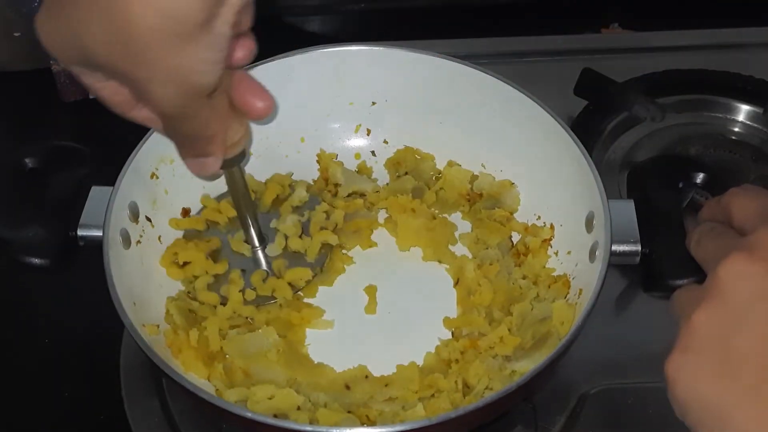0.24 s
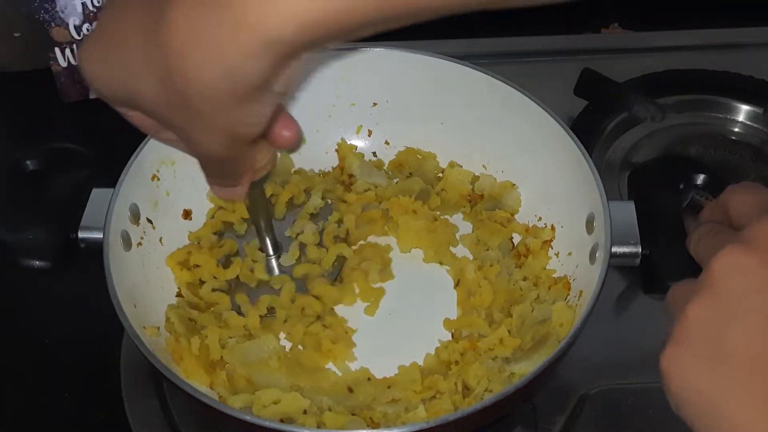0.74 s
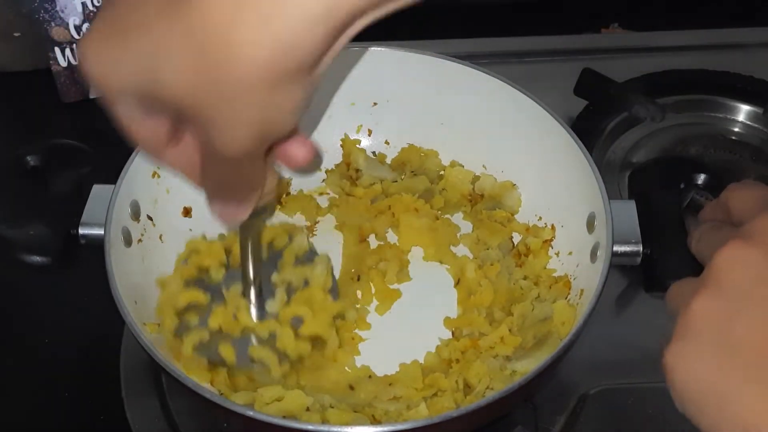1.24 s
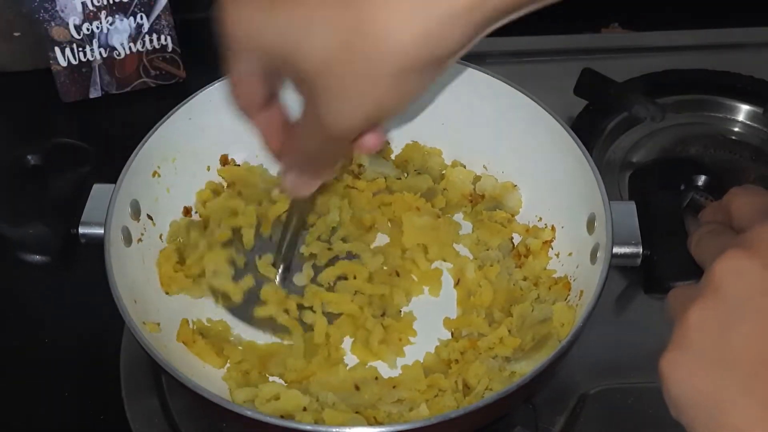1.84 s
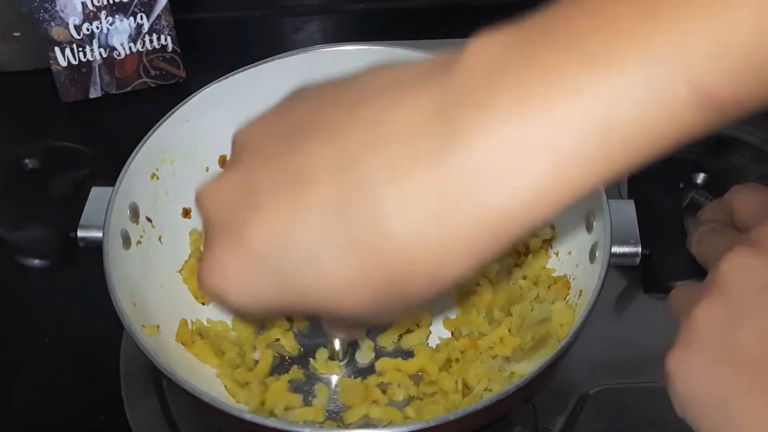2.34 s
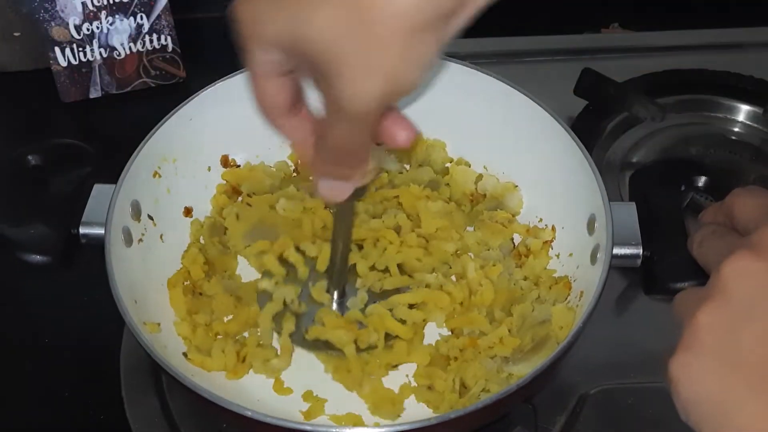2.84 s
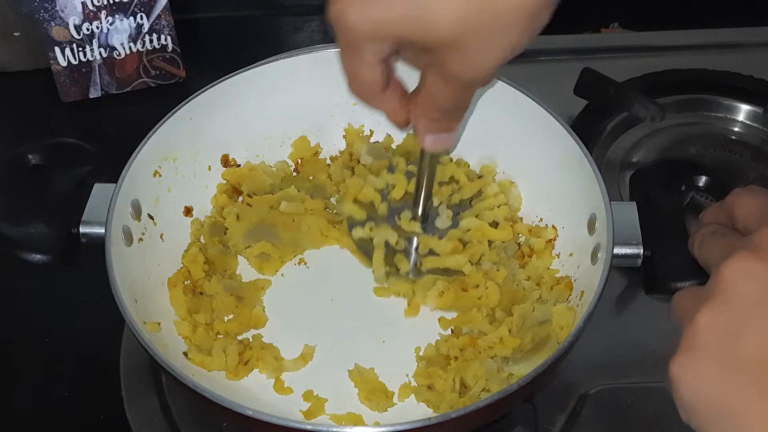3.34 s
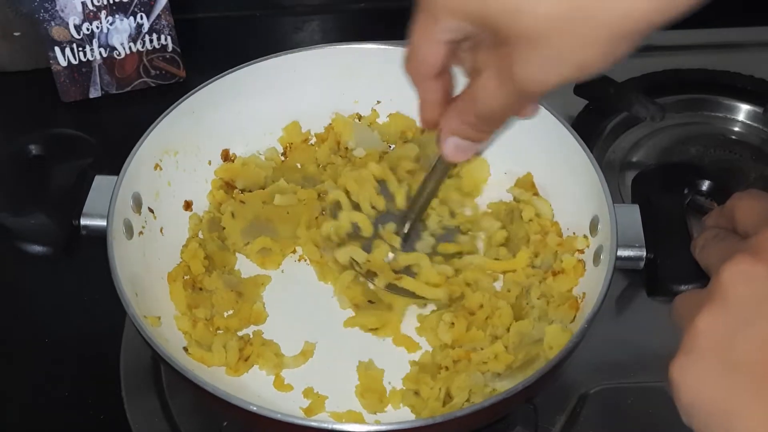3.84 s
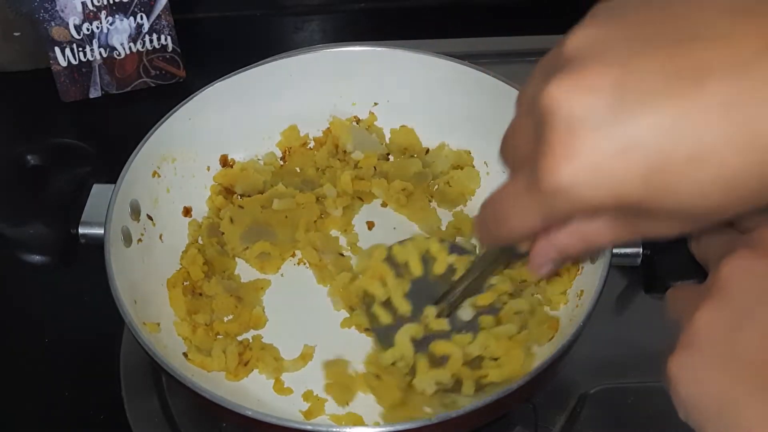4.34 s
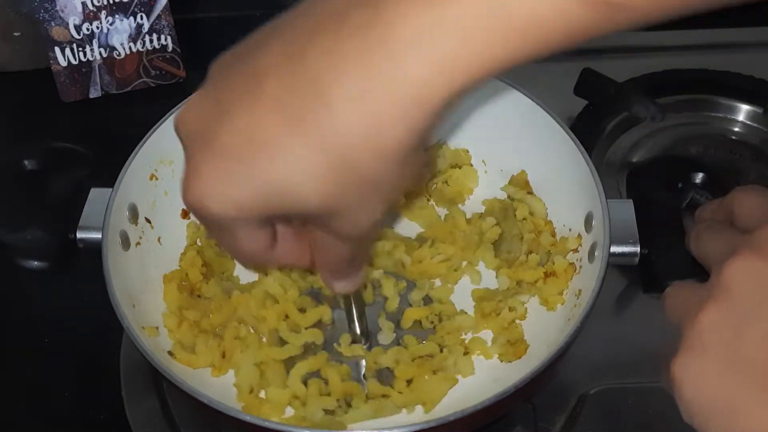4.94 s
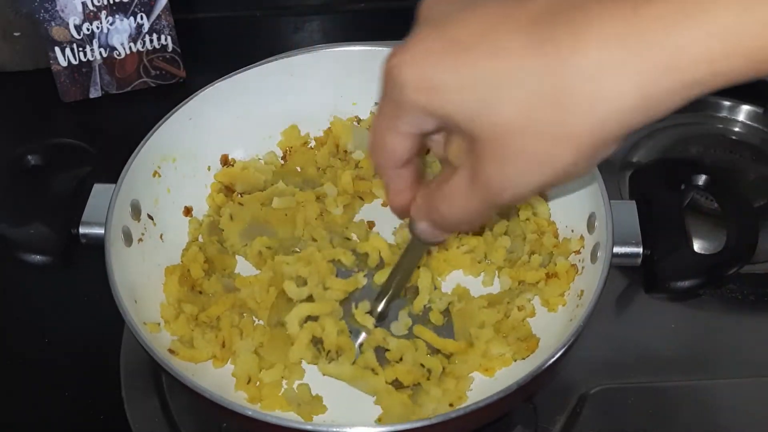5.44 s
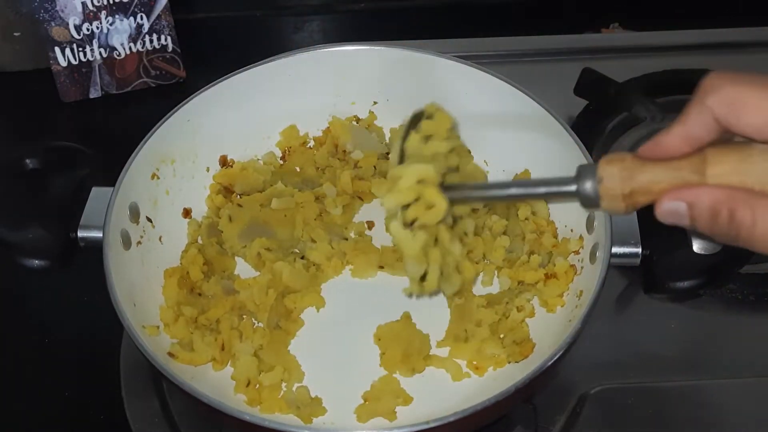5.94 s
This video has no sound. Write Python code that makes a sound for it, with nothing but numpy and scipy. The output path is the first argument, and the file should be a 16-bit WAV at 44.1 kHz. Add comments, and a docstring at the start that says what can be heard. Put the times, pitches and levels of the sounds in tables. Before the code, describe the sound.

A steel masher squelches through boiled potato in a pan, clinking on the bottom with hollow pan knocks, over a low beating fan hum.

```python
"""Soft squelches, wet pops, clinks and knocks: a steel masher presses boiled potatoes in a pan on a stove, close by.
Coloured noise and random grains make the squelch and push; when the plate gets through, struck modes and dense
noise make it clink on the bottom and the pan knock on its support. Dull thuds and thin squeaks come in between.
Behind are a faint frying hiss of filtered noise and two sine motors that beat over a rush of air;
decaying noise tails let the small room ring briefly."""
import sys
import numpy as np
from scipy import signal
from scipy.fft import rfft, irfft, next_fast_len
from scipy.io import wavfile

SR = 44100
rng = np.random.default_rng(int(sys.argv[2]) if len(sys.argv) > 2 else 0)


def to_wav(sig):
    """Store sig (one row per channel, or 1-D mono) as 16-bit WAV at the path in sys.argv[1].

    Samples outside -1..1 are clipped; the rate is SR.
    """
    pcm = np.clip(np.atleast_2d(sig), -1, 1) * 32767
    pcm = np.round(pcm).astype(np.int16)
    wavfile.write(sys.argv[1], SR, pcm.T)  # frames by channels


N = 272345  # length in samples
TIME = np.arange(N) / SR  # seconds
AGE = TIME[:SR * 3 // 5]  # seconds since the onset of a short sound
ROOM_T60_S = .33


def undb(db):
    """Decibels to gain."""
    return 10 ** (np.asarray(db) / 20)


def unit(x):
    """Scale to rms 1."""
    return x / np.sqrt(np.mean(x ** 2))


def curves(table):
    """Every column of a table joined by straight lines in time."""
    s, *columns = np.transpose(table)
    return [np.interp(TIME, s, c) for c in columns]


def colour(x, points, boost=np.zeros_like):
    """Give x a spectrum of (Hz, dB) points plus boost(Hz) dB; rms 1."""
    size = next_fast_len(len(x))
    f = np.maximum(np.fft.rfftfreq(size, 1 / SR), 1)
    hz, db = np.transpose(points)
    gain = undb(np.interp(np.log(f), np.log(hz), db) + boost(f))
    return unit(irfft(rfft(x, size) * gain, size)[:len(x)])


def band(hz, width_hz, size):
    """Noise passed twice through the same resonance for steep sides; rms 1."""
    b, a = signal.iirpeak(min(hz, .45 * SR), hz / min(width_hz, SR / 4), fs=SR)
    once = signal.lfilter(b, a, rng.standard_normal(size))
    return unit(signal.lfilter(b, a, once))


def fade(t60):
    """Exponential decay that loses 60 dB in t60 seconds."""
    return np.exp(-np.log(1000) * AGE / t60)


def walk(rate):
    """Random wandering: normal points, rate of them per second, joined by straight lines."""
    points = rng.standard_normal(N)
    return np.interp(TIME * rate, np.arange(N), points)


def add(out, s, sound):
    """Mix a sound into out at time s."""
    start = int(s * SR)
    out[start:start + len(sound)] += sound[:N - start]


def fans(rush_db=-6.5):
    """Two motors of nearly equal speed drift in and out of step over a rush of air."""
    # the second motor sags towards the steady one and recovers, so their beat slows: (time [s], frequency [Hz])
    sagging_motor = [(0, 79.77), (.9, 78.78), (2, 79.22), (2.7, 79.57), (3.35, 79.24), (4, 77.39),
                     (4.7, 75.53), (5.4, 77.41), (6.18, 78.71)]
    # level of the hum, which the rush follows: (time [s], level [dB])
    hum_level = [(0, -37.5), (3.2, -37.5), (4.2, -41), (6.18, -42)]
    # spectrum of the steady rush: (frequency [Hz], level [dB])
    rush_colour = [(25, -45.5), (32, -5), (36, 3.5), (58, 7.5), (90, -7.5), (120, -4), (170, -34),
                   (300, -21.5), (560, -32), (720, -28), (830, -17.5), (950, -34), (1130, -22),
                   (1700, -44.5), (15000, -63)]
    steady_hz, in_step_s = 74.2, .18  # at in_step_s both motors turn together
    sagging_hz, = curves(sagging_motor)
    level_db, = curves(hum_level)
    turns = np.cumsum([np.full(N, steady_hz), sagging_hz], axis=1) / SR
    turns_from_step = turns - turns[:, [int(in_step_s * SR)]]
    hum = np.sin(2 * np.pi * turns_from_step).sum(axis=0)
    rush = colour(rng.standard_normal(N), rush_colour)
    return undb(level_db) * (unit(hum) + undb(rush_db) * rush)


def sizzle(flicker_db=0.2):
    """Moisture fries away on the hot bottom in a fine hiss of noise."""
    # slow swell of the hiss: (time [s], level [dB])
    hiss_level = [(0.0, -53), (0.45, -51), (1.55, -55), (2.92, -52.5), (3.1, -55), (3.53, -51),
                  (4.64, -57.5), (5.37, -55), (5.56, -57.5), (6.18, -58)]
    # spectrum of the hiss: (frequency [Hz], level [dB])
    hiss_colour = [(1000, -20), (2900, -28.5), (3800, -9), (4800, -5.5), (5800, -0.5), (7500, 0.5),
                   (9000, -5), (10500, -13.5), (13000, -20.5), (15500, -26)]
    level_db, = curves(hiss_level)
    return colour(rng.standard_normal(N), hiss_colour) * undb(level_db + flicker_db * walk(21))


def effort():
    """Gains of squelch and push: each stroke swells, holds and relaxes above the clinging mash."""
    # pushes and pulls through the potato: (start [s], length [s], wet squelch level [dB], dull push level [dB])
    strokes = [(0.12, 0.31, -59, -56), (0.488, .2, -51.5, -52.5), (0.711, .06, -48.5, -52),
               (1.153, 0.095, -65, -45.5), (1.579, 0.41, -56.5, -54.5), (2.017, 0.13, -81, -56),
               (2.516, 0.25, -53, -52), (2.914, 0.095, -50.5, -45), (3.136, 0.074, -61, -54),
               (3.355, 0.18, -51.5, -52.5), (3.718, 0.36, -51, -52), (4.86, 0.19, -55, -54.5),
               (5.202, 0.31, -57.5, -51.5), (5.72, 0.082, -60, -63), (5.923, 0.08, -64, -51)]
    attack_s, release_s = 0.046, 0.061  # linear build-up, time constant of the relaxation
    cling_wet_db, cling_push_db = -62, -57  # potato clinging to the moving plate between strokes
    lift_out_s, lift_fade_s = 5.71, 0.45  # the masher leaves the potato and the clinging dies away
    in_pan = np.exp(-np.maximum(TIME - lift_out_s, 0) / lift_fade_s)
    wet, push = undb(cling_wet_db) * in_pan, undb(cling_push_db) * in_pan
    for start, length, wet_db, push_db in strokes:
        age = TIME - start
        build_up = np.clip(age / attack_s, 0, 1)
        pressure = build_up * np.exp(-np.maximum(age - length, 0) / release_s)
        wet = np.hypot(wet, undb(wet_db) * pressure)
        push = np.hypot(push, undb(push_db) * pressure)
    return wet, push


def mash(wet_gain, push_gain, grain_rate=1500, spread_db=3.0):
    """Tiny sticky ruptures make the squelch; the soft mass passes a dull rumble to the pan."""
    # spectra of squelch and push, both coloured by the pan: (frequency [Hz], level [dB])
    squelch_colour = [(250, -15), (400, 15.5), (600, -3.5), (830, 6), (1200, 3.5), (1600, -3), (2800, -10),
                      (3250, -0.5), (4500, 0.5), (7500, -9), (11000, -16.5), (15500, -31)]
    push_colour = [(25, -42.5), (70, -2), (125, 2.5), (200, -6), (300, 0), (420, -12.5), (600, -8),
                   (830, -6), (1300, -20.5), (2500, -25.5), (8000, -69.5)]
    ruptures = rng.random(N) < grain_rate / SR  # grain_rate is the mean number per second
    grain_db = spread_db * np.minimum(rng.exponential(size=N), 6)
    grains = ruptures * rng.choice([-1, 1], N) * undb(grain_db)
    room = rng.standard_normal(len(AGE)) * fade(ROOM_T60_S)
    echo = signal.fftconvolve(grains, room)[:N]
    wet = unit(grains) + undb(7.5) * unit(echo)
    push = colour(rng.standard_normal(N), push_colour) * undb(3.1 * walk(30))
    return wet_gain * colour(wet, squelch_colour) + push_gain * push


def rub(wet_gain, rub_db=-44, effort_share=0.38):
    """The rubbing plate keeps a pair of pan resonances faintly singing, a little more under pressure."""
    pair = band(800, 36, size=N) + band(855, 30, size=N)
    return unit(pair) * undb(rub_db) * wet_gain ** effort_share


def pops(rise_s=0.0015):
    """Air pockets burst as potato squeezes through the holes of the plate."""
    # the loudest wet pops: (time [s], level before the envelope [dB], centre [Hz], width of each filter pass [Hz])
    bursts = [(0.203, -33.5, 6840, 1300), (0.241, -33, 6700, 1800), (.755, -32, 6500, 4500),
              (1.207, -48, 2200, 3000), (1.5526, -44.5, 2820, 2000), (1.639, -40.5, 2800, 2500),
              (1.676, -40, 5670, 4000), (1.723, -44.5, 3020, 2000), (2.376, -50, 7960, 7000),
              (3.45, -34, 3780, 5000), (3.886, -34, 4480, 4000), (3.955, -30, 12600, 5000),
              (3.962, -22, 6670, 1830), (4.888, -42.5, 4500, 4000), (4.963, -44.5, 4500, 4000),
              (5.028, -41, 5000, 5000)]
    out = np.zeros(N)
    decay = np.hypot(fade(0.027), undb(-23) * fade(ROOM_T60_S))  # burst, then room
    envelope = decay * (1 - np.exp(-AGE / rise_s))
    for s, db, hz, width_hz in bursts:
        add(out, s, undb(db) * band(hz, width_hz, size=len(AGE)) * envelope)
    return out


def ring(modes, boost, scatter_db, detune, sustain):
    """Struck modes; the place of the blow and the potato load change their strength and pitch."""
    hz, db, t60 = np.transpose(modes)
    strength, load = rng.standard_normal((len(hz), 2)).T
    gain = undb(db + boost(hz) + scatter_db * strength)
    # bending waves reach each radiating patch at its own moment
    cycles = np.outer(hz * (1 + detune * load), AGE) + rng.random((len(hz), 1))
    partials = np.sin(2 * np.pi * cycles) * fade(sustain * t60[:, None])
    return gain @ partials / np.sqrt(np.sum(gain ** 2) / 2)


def clatter(points, boost, t60, room_db):
    """Dense ringing that dies quickly and hands over to the room's reverberation."""
    envelope = np.hypot(fade(t60), undb(room_db) * fade(ROOM_T60_S))
    return colour(rng.standard_normal(len(AGE)), points, boost) * envelope


def cushion(x, hz, rise_s=0.00088):
    """A contact of finite length builds up briefly and excites the highest frequencies only weakly."""
    low_pass = signal.butter(2, min(hz, .45 * SR), fs=SR, output="sos")
    return signal.sosfilt(low_pass, x * (1 - np.exp(-AGE / rise_s)))


def plate_clink(tilt_db):
    """Steel meets the bottom; the less potato lies between, the brighter it rings."""
    # plate and shaft damped by potato: (frequency before detuning [Hz], level [dB], t60 before sustain factor [s])
    plate_modes = [(1600, -2, .08), (1770, -1, .09), (1920, 0, .09), (2320, -9, .09), (2860, -7, .11),
                   (3200, -5.5, .13), (3710, -12, .18), (4020, -7, .1), (4250, -11, .1), (4650, -11, .11),
                   (5680, -11, .11), (5810, -9, .11), (6170, -14, .1), (6660, -12, .13), (7200, -11, .11),
                   (7530, -15, .1), (8680, -17, .08)]
    # spectrum of the masher's dense, unresolved ringing: (frequency [Hz], level [dB])
    plate_colour = [(200, -32.5), (700, -14), (1200, 0.5), (1850, 7.5), (2200, -3), (3200, -1.5),
                    (3750, -10.5), (4150, -2.5), (5050, -12), (5800, -6.5), (6300, -18), (7100, -12.5),
                    (8000, -17), (10500, -21), (15500, -34.5)]

    def tilt(hz):
        return tilt_db * np.log2(hz / 3500)

    modes = ring(plate_modes, tilt, scatter_db=3.1, detune=.01, sustain=0.79)
    dense = clatter(plate_colour, tilt, t60=0.13, room_db=-2.5)
    return cushion(undb(3.5) * modes + undb(1.5) * dense, hz=8600)


def pan_knock(spot_hz, spot_db=6.5, spot_octaves=.4):
    """The pan bumps its support; the modes that swing most at the struck spot are boosted."""
    # the pan on its support: (frequency before detuning [Hz], level [dB], t60 before sustain factor [s])
    pan_modes = [(245, -11, .3), (383, -9.5, .3), (431, -8, .25), (476, -4.5, .3), (660, -7, .3),
                 (796, -2.5, .33), (815, -4, .24), (846, -3, .33), (868, -6, .22), (965, -7, .22),
                 (1068, -5, .24), (1130, -8, .24), (1238, -4, .22), (1310, -7, .2), (1416, -5, .22),
                 (1470, -5, .22), (1538, -4, .2), (1618, -3, .2), (1733, -2, .24), (1795, -4, .2),
                 (1873, -2, .25), (1944, -3, .22)]
    # spectrum of the pan's dense, unresolved ringing: (frequency [Hz], level [dB])
    pan_colour = [(90, -12.5), (200, -17.5), (330, -12.5), (400, 0.5), (600, -3), (830, 2), (1000, -5.5),
                  (1850, -9), (2200, -11.5), (3300, -16.5), (5500, -23.5), (15000, -51.5)]

    def spot(hz):
        return spot_db * np.exp(-(np.log2(hz / spot_hz) / spot_octaves) ** 2)

    modes = ring(pan_modes, spot, scatter_db=3, detune=0.0022, sustain=1.11)
    dense = clatter(pan_colour, spot, t60=0.04, room_db=-1.5)
    return cushion(undb(1.5) * modes + undb(0.5) * dense, hz=3580)


def knocks():
    """Each contact rings the plate and the pan in its own proportion."""
    # contacts of plate, pan and support: (time [s], relative pan level [dB], frequency the spot favours [Hz],
    # relative plate level [dB], plate tilt [dB per octave])
    contacts = [(0.2874, -32.5, 870, -29.5, -4), (0.9109, -30, 1530, -31.5, 1.5), (0.92, -26, 1470, -31, 3),
                (0.9331, -22.5, 1130, -56, -3), (.971, -30.5, 1210, -59, 0),
                (1.3506, -30, 1440, -30.5, 0.5), (1.365, -27.5, 250, -55, -9), (1.396, -41.5, 436, -52, 9),
                (1.808, -34.5, 1900, -23.5, -3), (1.8357, -22, 890, -30.5, -2),
                (2.3324, -30.5, 1600, -30, 4), (2.352, -28.5, 430, -40, -4), (2.368, -26, 910, -34, 3.5),
                (2.783, -31, 656, -60.5, -9), (2.7887, -18.5, 1300, -23, 0.5),
                (3.9267, -15, 1153, -17, 1.5), (4.587, -30.5, 910, -30, 1), (4.626, -36, 847, -37.5, -6.5),
                (5.285, -31, 390, -36, -0.5), (5.333, -40.5, 850, -51, 0), (5.935, -63.5, 1750, -70.5, -4)]
    out = np.zeros(N)
    for s, pan_db, spot_hz, plate_db, tilt_db in contacts:
        knock = undb(pan_db) * pan_knock(spot_hz)
        clink = undb(plate_db) * plate_clink(tilt_db)
        add(out, s, knock + clink)
    return out


def squeaks(waver=0.0103):
    """As the plate slides, a thin, faint, unsteady whistle fades in and out."""
    # slides of the plate: (start [s], end [s], mean frequency [Hz], level before the fades [dB])
    slides = [(.46, .7, 3230, -67), (.62, .9, 3110, -66), (3.1, 3.5, 3320, -66), (3.54, 3.78, 3310, -67)]
    out = np.zeros(N)
    for start, end, hz, db in slides:
        size = int((end - start) * SR)
        wavering_hz = hz * (1 + waver * walk(133)[:size])
        whistle = np.sin(2 * np.pi * np.cumsum(wavering_hz) / SR)
        add(out, start, undb(db) * unit(whistle) * signal.windows.hann(size))
    return out


def thuds(peak_s=0.017, width_share=0.44):
    """The plate sinks into the mash: cushioned pushes swell and die without a crack."""
    # soft bumps: (time [s], level at the envelope's peak [dB], centre [Hz])
    bumps = [(1.644, -47.5, 150), (2.069, -47, 293), (2.783, -40.5, 145), (2.989, -46.5, 295),
             (3.429, -36, 130), (3.877, -41, 149), (5.78, -48, 168)]
    out = np.zeros(N)
    swell = AGE / peak_s * np.exp(1 - AGE / peak_s)
    for s, db, hz in bumps:
        # width of each filter pass as a share of the centre
        add(out, s, undb(db) * band(hz, width_share * hz, size=len(AGE)) * swell)
    return out


def scene():
    """Everything in one channel, heard close to the pan."""
    wet_gain, push_gain = effort()
    background = fans() + sizzle()
    potato = mash(wet_gain, push_gain) + rub(wet_gain) + pops()
    return (background + potato + knocks() + squeaks() + thuds())[None]


def record(dry):
    """A steep low-pass removes the top of the treble."""
    top_hz = 15700
    low_pass = signal.ellip(10, .1, 80, top_hz, fs=SR, output="sos")  # ripple and stopband in dB
    return signal.sosfilt(low_pass, dry)


dry = scene()
out = record(dry)
to_wav(out)
```